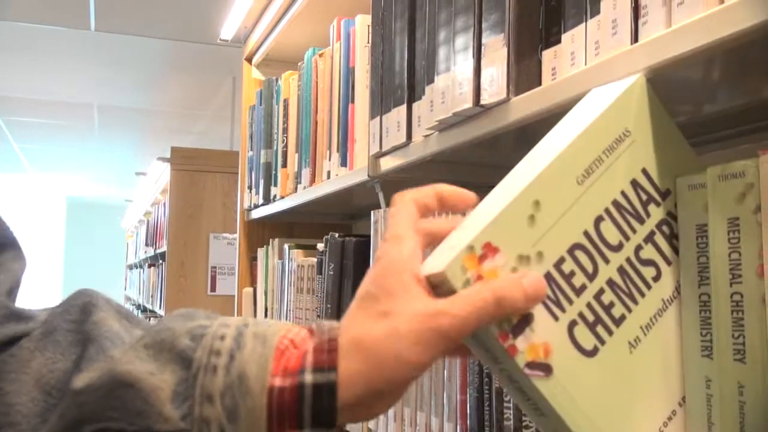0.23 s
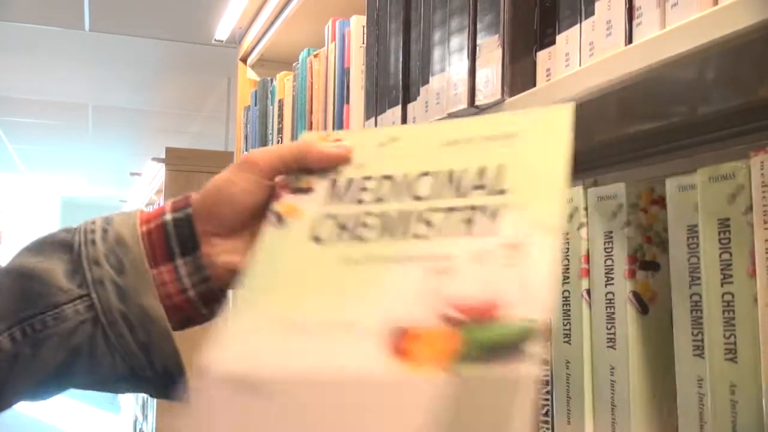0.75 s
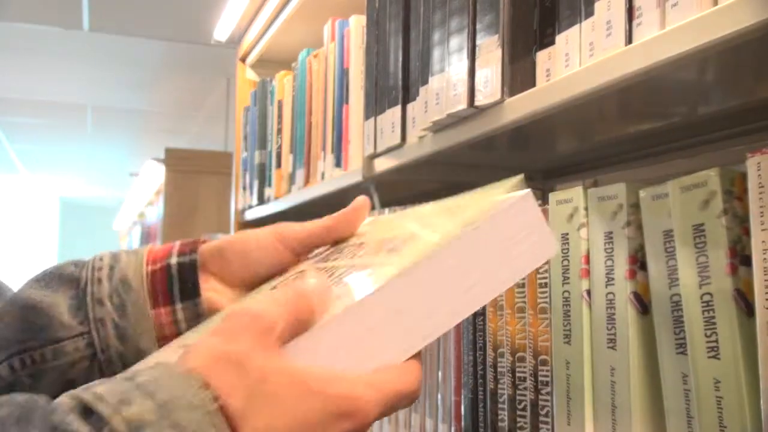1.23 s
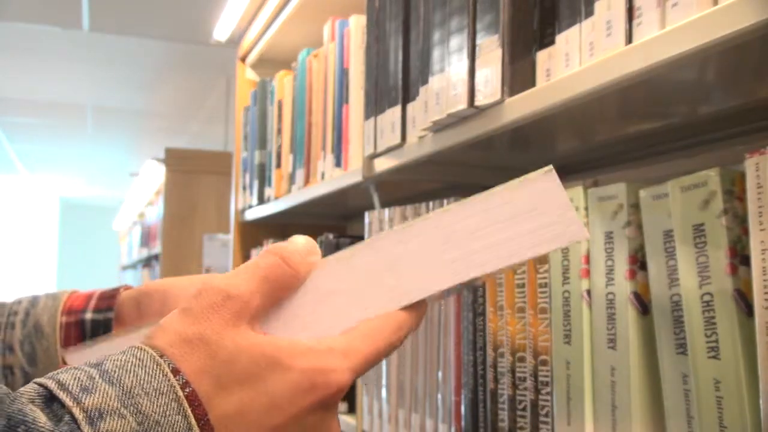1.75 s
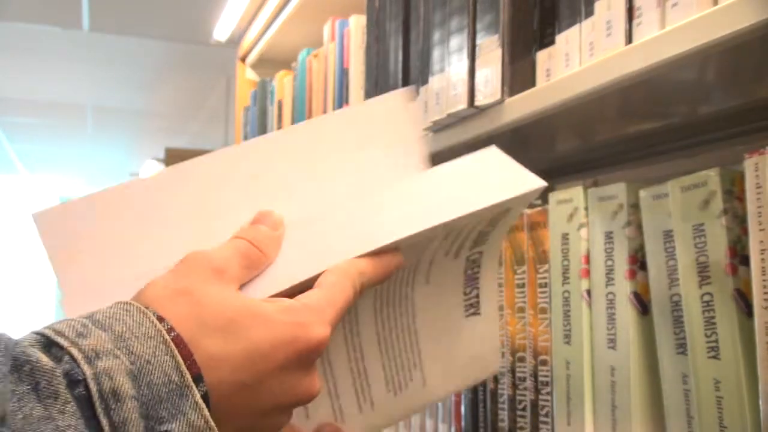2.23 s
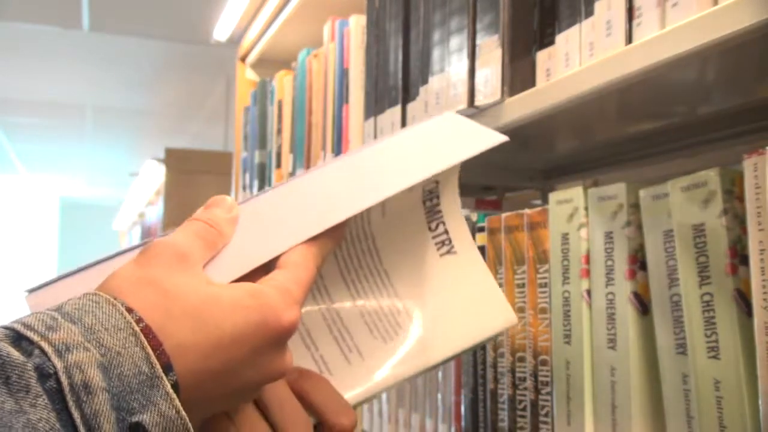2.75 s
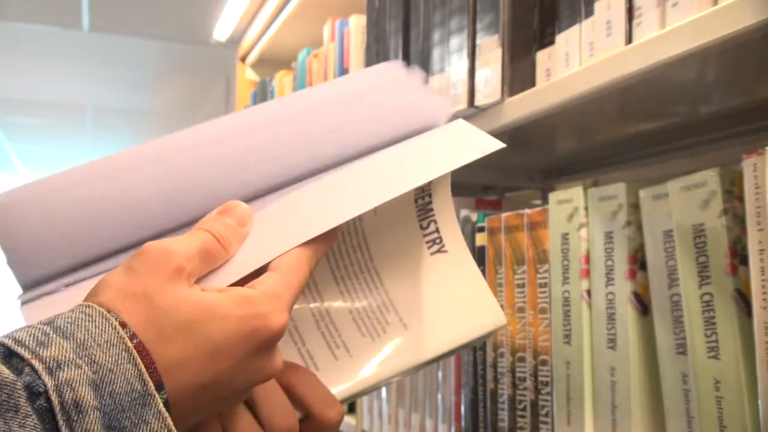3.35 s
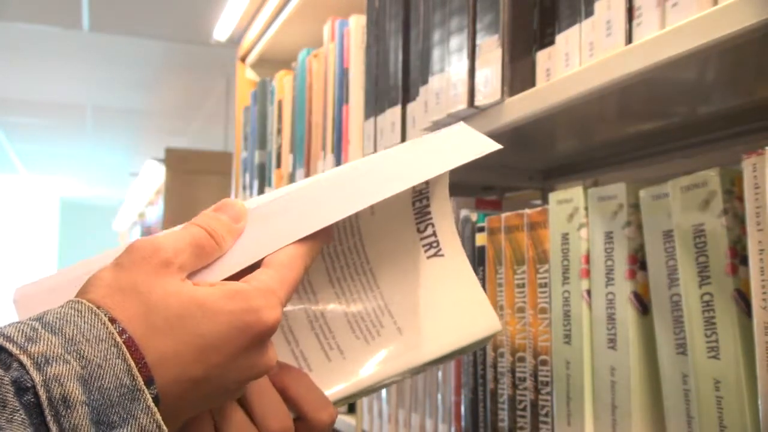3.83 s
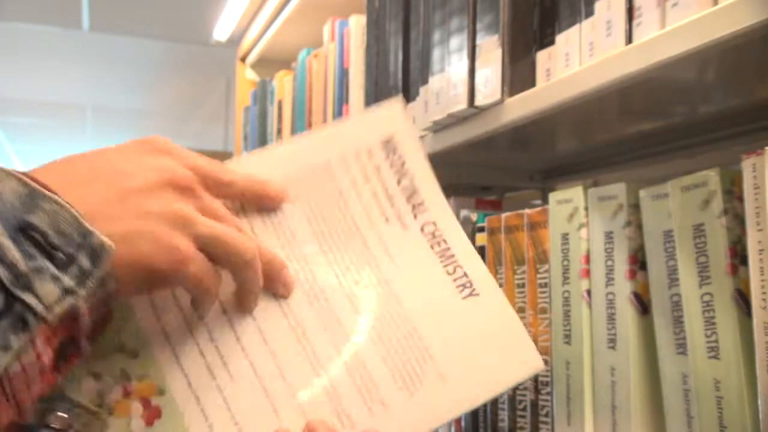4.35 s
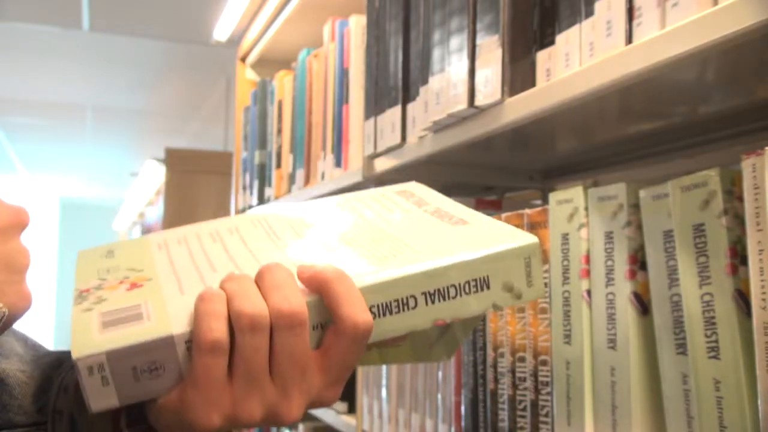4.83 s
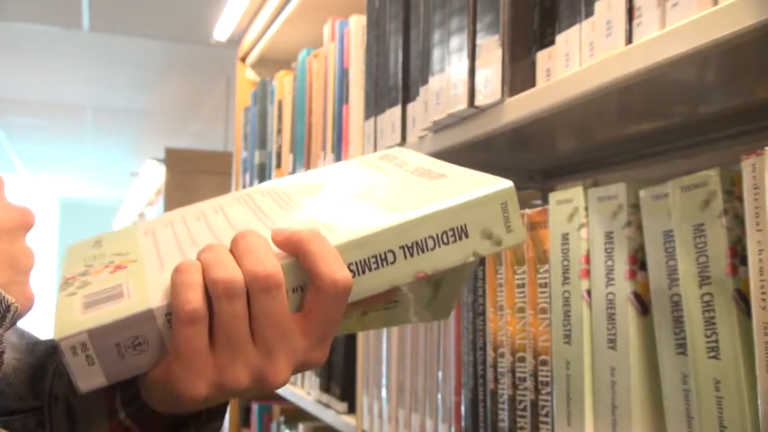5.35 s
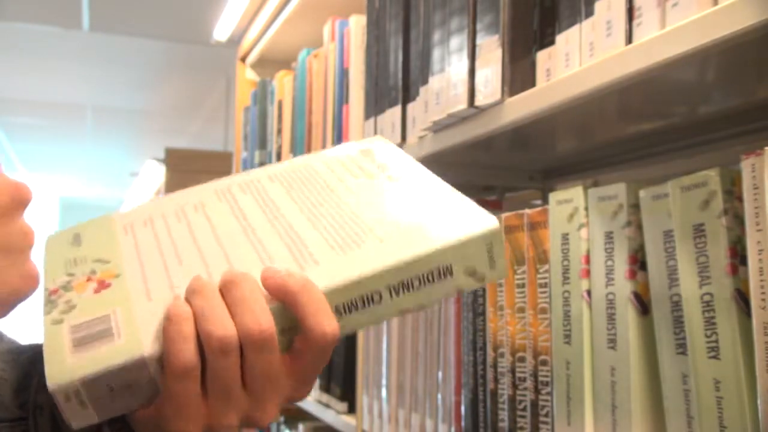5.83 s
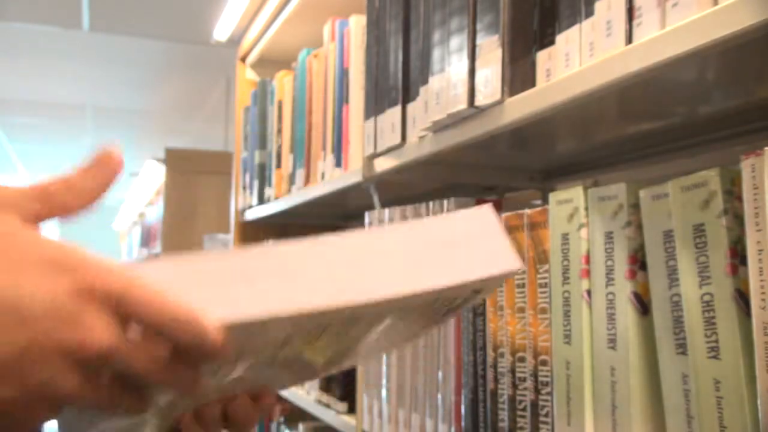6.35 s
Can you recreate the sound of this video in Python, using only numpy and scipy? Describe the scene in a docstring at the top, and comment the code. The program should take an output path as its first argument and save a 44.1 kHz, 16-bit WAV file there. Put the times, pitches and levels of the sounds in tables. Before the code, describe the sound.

Close and dry, slightly right of centre: a glossy book cover scrapes along its neighbours, bumps a steel shelf and pulls free with a sharp swish. Muffled hand thuds and a page flap follow, then bursts of crisp riffling paper, densest halfway through, and a closing slap. Low ventilation hum and thin hiss dip under the handling and swell back in the pause before a last rustle.

```python
"""Library aisle: a thick paperback slides off a steel shelf, knocks it, is turned over, flicked through, shut.
Covers, fingertips and paper hiss as coloured noise; the cover squeaks in short gliding tones.
Flaps and page snaps are noise puffs through resonances; thuds and the shelf knock are decaying sines.
Ventilation noise, a low rumble and thin steady tones sink at listed moments and swell back."""
import sys
import numpy as np
from scipy import signal
from scipy.fft import rfft, irfft, next_fast_len
from scipy.io import wavfile
from scipy.ndimage import uniform_filter1d, map_coordinates

SR = 44100
rng = np.random.default_rng(int(sys.argv[2]) if len(sys.argv) > 2 else 0)


def dump_mix(stems):
    """Bounce the given channels to the path in sys.argv[1] as a 16-bit WAV at rate SR."""
    frames = np.atleast_2d(stems).T  # one column per channel
    limited = np.clip(frames, -1, 1)  # hard clip at full scale
    pcm = np.round(limited * 32767).astype(np.int16)
    wavfile.write(sys.argv[1], SR, pcm)


N = 290461

# Paper moving: (time [s], swell [s per 10 dB], hold [s], fade [s per 10 dB],
# whole sheets [dB], folds [dB], surface [dB])
PAPER_RUBS = [(0, .01, 0.01, 0.094, -43, -43.5, -46.5), (.18, 0.06, 0.052, 0.026, -52, -51.5, -50),
              (.335, 0.072, .005, 0.1, -52.5, -70, -74), (.625, 0.11, 0.077, 0.019, -50, -50, -51),
              (.71, 0.028, 0.034, 0.013, -55, -55, -47.5), (.78, 0.024, 0.023, 0.28, -48.5, -55, -77),
              (.986, 0.16, 0.099, .02, -55, -48.5, -48), (1.177, 0.056, .005, 0.027, -62, -59.5, -62.5),
              (1.5, 0.12, 0.035, 0.029, -54, -53, -56), (1.734, 0.15, .005, 0.11, -45.5, -54.5, -52.5),
              (1.9, 0.04, 0.23, .03, -57, -65, -68), (2.217, 0.044, 0.023, 0.076, -38, -46, -49.5),
              (2.5, 0.032, 0.019, 0.043, -43.5, -45.5, -50.5),
              (2.565, 0.012, 0.043, 0.013, -52, -52.5, -49.5), (2.67, 0.023, .005, 0.12, -66, -55.5, -58),
              (2.768, 0.068, 0.048, 0.025, -38, -59, -77), (2.854, 0.035, .005, 0.029, -49, -57, -58.5),
              (3.135, 0.0096, 0.029, 0.055, -41.5, -44, -44.5),
              (3.225, 0.047, 0.031, 0.0063, -45.5, -49, -47), (3.328, 0.035, .005, 0.024, -48, -52, -49),
              (3.365, 0.016, .02, 0.043, -50, -47, -60), (3.44, 0.033, 0.029, 0.014, -36.5, -43, -47.5),
              (3.536, .02, .005, 0.0092, -45.5, -56, -60), (3.686, 0.073, 0.0034, 0.074, -45, -59, -75),
              (3.63, 0.057, .01, .03, -53, -66, -81), (3.7, 0.036, .01, 0.026, -56, -48.5, -71.5),
              (3.77, 0.023, 0.0061, 0.016, -58.5, -61, -63.5), (4.135, 0.063, .03, 0.13, -52, -58.5, -58),
              (4.262, 0.018, 0.036, 0.021, -47, -45.5, -50), (4.37, 0.064, 0.073, 0.036, -43, -45, -48.5),
              (4.518, .04, .005, .015, -53, -80, -78), (4.68, 0.13, 0.0041, 0.048, -62, -55, -56.5),
              (4.769, 0.046, 0.0037, 0.36, -47, -54.5, -58),
              (6.142, 0.088, 0.0024, 0.0084, -44.5, -43.5, -47.5),
              (6.449, 0.24, 0.097, .1, -53, -58, -61.5)]
# Colour of crisp paper: (frequency [Hz], relative density [dB])
CRISP_COLOUR = [(470, -33), (800, -12), (1610, 2.5), (2280, -3), (3450, -11.5), (4650, -3), (6430, -8),
                (8460, -6.5), (15800, -11)]
USUAL_DB = -25  # level at which a burst has its nominal sharpness


def amp(db):
    """Gain of a level in dB."""
    return 10 ** (np.asarray(db) / 20)


def unit(x):
    """Scaled to rms 1."""
    return x / np.sqrt(np.mean(x ** 2) + 1e-20)


def along(points, hz):
    """Interpolates (Hz, value) points on a log frequency axis."""
    f, v = np.transpose(points)
    return np.interp(np.log(hz + 1), np.log(f + 1), v)


def wobble(rate_hz):
    """Smooth random curve with rate_hz knots a second."""
    knots = rng.standard_normal(int(N * rate_hz / SR) + 4)
    return map_coordinates(knots, [np.arange(N) * rate_hz / SR])


def filtered(x, response):
    """Multiplies the spectrum of x by a response of frequency."""
    size = next_fast_len(N + 8192)
    spectrum = rfft(x, size) * response(np.fft.rfftfreq(size, 1 / SR))
    return irfft(spectrum, size)[..., :N]


def noise(colour, grain_db=0.0, grain_rate_hz=300.0):
    """Coloured noise of rms 1, broken into grains of uneven size."""
    white = rng.standard_normal(N) * amp(grain_db * wobble(grain_rate_hz))
    return unit(filtered(white, lambda hz: amp(along(colour, hz))))


def slow(gain_at):
    """Gain curve of time, computed in coarse steps and joined by lines."""
    grid_samples = 32
    steps = np.arange(0, N + grid_samples, grid_samples)
    return np.interp(np.arange(N), steps, gain_at(steps / SR))


def strokes(rows, column=4):
    """Summed gain of strokes that swell, hold and fade along straight lines in dB."""
    step_db = 10  # swell and fade times are per this change of level

    def stroke(t, row):
        s, swell, hold, fade = row[:4]
        before = np.maximum((s - t) / max(swell, .002), 0)
        after = np.maximum((t - s - hold) / max(fade, .002), 0)
        return amp(row[column] - step_db * (before + after))

    return slow(lambda t: sum(stroke(t, row) for row in rows))


def fall(t60_s, rise_s):
    """Rising and decaying envelope of a blow, faded out by 1/7 s, and its time axis."""
    t = np.arange(SR // 7) / SR
    decay = amp(-60 * t / np.clip(t60_s, .003, 1))
    fade_out = np.cos(np.pi / 2 * t / t[-1])
    return decay * (1 - np.exp(-t / rise_s)) * fade_out, t


def add(track, s, sound):
    """Mixes a sound in at s seconds."""
    track[max(round(s * SR), 0):][:len(sound)] += sound


def bursts(events, sharpness, reach, rise_s, colour, blow):
    """Impulse and noise puff through a resonance applied twice; harder blows ring broader."""
    broadens = 0.12  # dB of width per dB of strength
    out = np.zeros(N + SR)
    for s, db, hz, t60_s in events:
        shape, t = fall(t60_s, rise_s)
        q = np.clip(sharpness * amp(broadens * (USUAL_DB - db)), hz / SR * 3, 6)
        b, a = signal.iirpeak(np.clip(hz, 100, 14000), q, SR)
        push = shape * colour[round(s * SR):][:len(t)] + blow * (t == t[8])
        treble_edge_hz = min(reach * hz, .45 * SR)
        soft = signal.lfilter(*signal.butter(2, treble_edge_hz, fs=SR), push)
        puff = signal.lfilter(b, a, signal.lfilter(b, a, soft))
        add(out, s, amp(db) * puff / np.max(np.abs(puff)))
    return out[:N]


def cover_slides():
    """Glossy cover rubbing its neighbours: even hiss that stops as the cover comes free."""
    # (time [s], swell [s per 10 dB], hold [s], fade [s per 10 dB], level [dB])
    slides = [(0.0, .01, 0.17, 0.087, -39), (0.538, 0.041, 0.12, 0.026, -45),
              (0.704, 0.044, 0.005, 0.028, -29)]
    # Cover comes free, one per slide: time [s]
    stops_s = [.235, .66, .752]
    # Colours of first slide, slow and fast part of second: lists of (frequency [Hz], relative density [dB])
    gloss = [
        [(1470, -39), (2500, -25), (3650, -7), (4630, -0.5), (5240, -1.5), (6820, 1), (9500, -2), (10700, 4.5),
         (13800, -6), (15800, -6)],
        [(1470, -41), (2500, -16), (2720, -9), (3650, -13), (4290, 3), (4820, 1.5), (5490, 1.5), (7890, -4.5),
         (11300, 2), (15800, -10)],
        [(1470, -41), (2500, -22), (3200, -17), (3510, -9), (5200, -3.5), (8660, -11), (9420, 1), (10900, 0.5),
         (13300, -5), (15100, -8), (15800, -7)],
    ]
    t = np.arange(N) / SR
    out = np.zeros(N)
    for slide, stop_s, colour in zip(slides, stops_s, gloss):
        contact = np.clip((stop_s - t) / .01, 0, 1)
        out += strokes([slide]) * contact * noise(colour, grain_db=1.5, grain_rate_hz=180.0)
    return out


def paper_rubs():
    """Paper friction moves in grains, coarser for the larger parts."""
    # Colours of whole sheets, folds, surface: (frequency [Hz], relative density [dB])
    sheet = [(120, -23), (200, 6), (400, 2.5), (483, 1.5), (629, -3), (900, -6), (1170, -37), (1980, -120)]
    fold = [(410, -4), (700, 1.5), (1310, 1), (2170, -5.5), (2380, -36.5), (2800, -17.5), (3640, -42),
            (6160, -120)]
    surface = [(1290, -18), (2200, 2), (2370, 5), (3790, -1.5), (4260, 0.5), (5970, -5), (11500, -10.5),
               (15800, -14)]
    sheets = strokes(PAPER_RUBS) * noise(sheet, grain_db=3.0, grain_rate_hz=60.0)
    folds = strokes(PAPER_RUBS, column=5) * noise(fold, grain_db=2.5, grain_rate_hz=140.0)
    surfaces = strokes(PAPER_RUBS, column=6) * noise(surface, grain_db=1.5, grain_rate_hz=240.0)
    return sheets + folds + surfaces


def ticks():
    """Small crackles of uneven size at random moments, as strong as the surface motion."""
    ticks_per_s, t60_s, spread_db, level_db = 65, 0.0094, 5, -10
    sizes = amp(spread_db * rng.standard_normal(N))
    starts = (rng.random(N) < ticks_per_s / SR) * sizes
    shape, _ = fall(t60_s, rise_s=0.0006)
    envelope = np.abs(signal.fftconvolve(starts, shape)[:N])
    crackle = unit(envelope * noise(CRISP_COLOUR))
    return amp(level_db) * strokes(PAPER_RUBS, column=6) * crackle


def sinking():
    """Background gain: after each dip the loss in dB decays exponentially; the deepest loss rules."""
    # (time [s], depth [dB])
    dips = [(0, 14), (.235, 19), (.39, 21), (.59, 5), (.75, 9), (1.09, 20), (1.21, 15), (1.6, 3), (1.78, 6),
            (2.3, 16.5), (2.62, 5), (2.85, 10.5), (3.16, 6.5), (3.472, 23), (3.72, 25), (3.76, 23),
            (3.86, 24.5), (4.2, 5), (4.495, 16), (6.15, 15.5)]
    recover_s = 0.39  # time constant

    def loss_db(t):
        losses = [np.where(t > s, db * np.exp(-np.abs(t - s) / recover_s), 0) for s, db in dips]
        return np.max(losses, axis=0)

    return slow(lambda t: amp(-uniform_filter1d(loss_db(t), size=9)))


def rumble():
    """Low noise that sinks with the background, jumps as the book moves and swells once."""
    # Rumble colour: (frequency [Hz], relative density [dB])
    low_colour = [(13, -40), (22, -12), (54, 8.5), (68, 4.5), (103, 1.5), (151, -8.5), (170, -6.5),
                  (220, -16), (370, -120)]
    # Jumps as the book moves: (time [s], hold [s], level [dB])
    pushes = [(0.01, 0.19, -47), (0.232, 0.012, -36), (0.388, .01, -39), (0.558, .01, -36),
              (0.757, .03, -38), (0.948, .06, -38), (1.048, 0.0083, -29.5), (1.173, 0.14, -41),
              (1.406, .01, -48), (1.521, 0.0088, -37), (1.944, 0.23, -49), (2.275, 0.038, -31.5),
              (2.404, 0.24, -48), (2.693, 0.15, -49.5), (3.107, 0.14, -51), (3.397, 0.053, -54),
              (3.706, 0.0067, -39.5), (4.249, 0.25, -47.5), (4.788, .01, -44), (5.52, 0.0087, -50),
              (5.717, 0.082, -44), (5.97, 0.0079, -47), (6.16, 0.0092, -38)]
    # Low air noise: (time [s], swell [s per 10 dB], hold [s], fade [s per 10 dB], level [dB])
    air_swell = [(5.25, 0.14, 0.25, 0.21, -48)]
    # Its colour: (frequency [Hz], relative density [dB])
    hollow = [(150, -41.5), (250, -2.5), (459, 0), (614, -23), (704, -10), (1100, -26), (1430, -53),
              (2420, -120)]
    steady_db, swell_s, fade_s = -42.5, 0.015, 0.032  # swell and fade per 10 dB
    jumps = strokes([(s, swell_s, hold, fade_s, db) for s, hold, db in pushes])
    low = (amp(steady_db) * sinking() + jumps) * noise(low_colour)
    return low + strokes(air_swell) * noise(hollow)


def background():
    """Ventilation noise, alike left and right in the bass, and steady tones; both sink together."""
    # Ventilation and hiss: (frequency [Hz], relative density [dB])
    air_colour = [(59, -35), (100, -2.5), (201, -4.5), (295, -11), (593, -17.5), (645, -17.5), (832, -20),
                  (1380, -24), (1710, -25.5), (12000, -31.5), (13900, -32), (15800, -32.5)]
    # (frequency [Hz], left-right likeness [0-1])
    alike = [(60, 1.0), (180, 0.99), (550, 0.99), (1650, 0.98), (4970, 0.82), (15000, 0.76)]
    # Tones: (frequency [Hz], rms before wobble and sinking [dB])
    whine = [(14158.7, -63), (7100, -77), (7149, -77), (15687, -76), (1705, -75), (200, -57)]
    air_db = -46  # before sinking
    t = np.arange(N) / SR

    def turn(hz):
        return np.arccos(np.clip(along(alike, hz), -1, 1)) / 2

    mid = filtered(noise(air_colour), lambda hz: np.cos(turn(hz)))
    side = filtered(noise(air_colour), lambda hz: np.sin(turn(hz)))
    tones = np.zeros(N)
    for hz, db in whine:
        level = np.sqrt(2) * amp(db + 0.63 * wobble(7.6))
        tones += level * np.sin(2 * np.pi * hz * t)
    air = amp(air_db) * np.array([mid + side, mid - side])
    return (air + tones) * sinking() * amp([[-.6], [.6]])


def flaps():
    """A sheet slapping another: a duller, narrower puff."""
    # (time [s], level [dB], centre [Hz], t60 [s])
    slaps = [(.005, -19.5, 1250, 0.047), (.062, -18.5, 1230, 0.069), (.205, -26, 353, 0.073),
             (.211, -22, 590, 0.1), (.227, -15.5, 502, 0.04), (.229, -13, 2190, 0.037),
             (.233, -19, 486, 0.024), (.385, -25, 694, .025), (.554, -22, 400, 0.036),
             (.581, -21.5, 350, 0.064), (.74, -23, 930, 0.031), (.743, -27.5, 405, 0.043),
             (.94, -31, 850, 0.025), (1.046, -30.5, 920, 0.058), (1.063, -30, 575, 0.14),
             (1.086, -13, 1370, .019), (1.195, -36, 423, 0.031), (1.519, -34.5, 660, 0.077),
             (1.747, -30, 655, .065), (1.772, -26.5, 860, 0.082), (1.773, -21.5, 1960, 0.047),
             (1.778, -20.5, 360, 0.064), (2.268, -30, 480, .015), (2.269, -14, 2050, .015),
             (2.303, -31, 345, 0.025), (2.595, -32.5, 1480, 0.089), (2.75, -21.5, 565, 0.078),
             (2.778, -23, 483, 0.085), (2.798, -31, 476, 0.096), (2.829, -26.5, 520, 0.04),
             (2.85, -26, 437, 0.054), (2.866, -26.5, 1010, .044), (3.137, -34, 374, .044),
             (3.152, -32.5, 375, 0.059), (3.249, -36, 440, 0.038), (3.351, -18.5, 430, 0.032),
             (3.361, -19.5, 446, 0.05), (3.4, -34, 764, .05), (3.423, -27, 477, 0.027),
             (3.442, -17.5, 607, 0.048), (3.45, -18.5, 730, 0.028), (3.472, -24, 1250, 0.023),
             (3.514, -36.5, 1170, .065), (3.539, -33, 1010, .054), (3.612, -36, 530, 0.028),
             (3.652, -27, 530, 0.031), (3.686, -19.5, 990, 0.022), (3.715, -28, 750, 0.036),
             (3.755, -43, 1920, 0.044), (3.834, -48, 530, 0.12), (3.846, -39.5, 1110, 0.053),
             (3.85, -48, 1740, 0.046), (4.131, -34.5, 404, 0.027), (4.171, -41, 413, 0.065),
             (4.254, -42, 450, 0.052), (4.485, -19, 404, 0.025), (4.489, -20.5, 645, 0.033),
             (4.498, -25, 384, 0.053), (4.529, -38, 438, .03), (4.767, -32, 435, 0.022),
             (6.149, -20.5, 543, 0.0062)]
    white = rng.standard_normal(N)
    return bursts(slaps, sharpness=1.25, reach=3.7, rise_s=0.0018, colour=white, blow=10.4)


def snaps():
    """A page edge slipping off the thumb: a few milliseconds of broad crackle."""
    # (time [s], level [dB], centre [Hz], t60 [s])
    edges = [(.0054, -15.5, 1820, 0.007), (.022, -29, 4000, .008), (.0608, -43, 2020, .013),
             (.2275, -28.5, 4500, 0.0097), (.237, -36, 2330, 0.013), (.3825, -35.5, 2250, 0.0093),
             (.5645, -32, 4430, .015), (.744, -19.5, 4230, 0.0076), (1.0454, -36, 2290, 0.02),
             (1.065, -28, 2570, 0.017), (1.0859, -15, 4060, .011), (1.7721, -35, 5000, 0.011),
             (2.044, -35.5, 8080, .015), (2.0845, -24.5, 6510, 0.019), (2.2707, -17.5, 4750, 0.013),
             (2.2912, -22, 5000, 0.015), (2.4177, -44, 6500, .01), (2.4329, -34, 2550, 0.0055),
             (2.594, -28.5, 3400, .017), (2.6143, -36, 3280, 0.0059), (2.645, -34, 2560, 0.0063),
             (2.829, -36, 6960, .019), (2.8423, -14.5, 6000, 0.013), (3.1224, -31.5, 5000, .012),
             (3.1487, -26.5, 3430, .045), (3.2217, -35, 3010, 0.017), (3.2387, -27, 2300, 0.026),
             (3.2503, -20.5, 4450, 0.018), (3.2944, -30, 2500, 0.04), (3.3315, -30.5, 3000, 0.018),
             (3.3543, -30.5, 5000, 0.031), (3.3676, -29.5, 2980, 0.011), (3.3901, -27.5, 2680, .02),
             (3.4134, -29, 2930, 0.015), (3.431, -27, 3140, .021), (3.4424, -35, 2810, 0.018),
             (3.452, -13.5, 2500, 0.017), (3.474, -19.5, 4870, 0.021), (3.5488, -33.5, 3330, 0.01),
             (3.6736, -46, 5000, 0.01), (3.688, -53, 4040, .012), (3.7183, -15, 4860, 0.013),
             (3.7564, -10, 5400, 0.0043), (3.8262, -55, 4000, 0.017), (4.1773, -32, 6800, .012),
             (4.1944, -33, 4500, .015), (4.4824, -28, 1810, 0.0088), (4.4879, -34, 1940, 0.014),
             (4.4899, -19, 2950, 0.018), (4.493, -19.5, 3500, 0.01), (4.721, -39.5, 8000, 0.024),
             (6.1493, -20.5, 2400, 0.0089), (6.174, -44, 2000, .01), (6.2394, -33, 3680, 0.0076),
             (6.4372, -40, 3810, 0.048)]
    crackle = noise(CRISP_COLOUR, grain_db=4.0, grain_rate_hz=2000.0)
    return bursts(edges, sharpness=0.63, reach=9, rise_s=0.0011, colour=crackle, blow=2.44)


def squeaks():
    """Cover sticking and slipping: slightly unsteady, gliding tones that swell and fade."""
    # (time [s], level [dB], first pitch [Hz], last pitch [Hz], length [s])
    glides = [(0.131, -32, 11300, 10500, .014), (0.16, -38, 9800, 10500, .009),
              (.685, -26, 15000, 15100, .02), (0.788, -41, 570, 600, 0.061), (0.807, -46, 640, 847, 0.093),
              (.885, -41.5, 588, 560, .06), (.925, -39.5, 550, 494, 0.029)]
    out = np.zeros(N + SR)
    for s, db, first_hz, last_hz, length_s in glides:
        count = round(length_s * SR)
        drift = 1 + 0.0003 * np.cumsum(rng.standard_normal(SR // 10)[:count])
        pitch_hz = np.linspace(first_hz, last_hz, count) * drift
        tone = np.sin(2 * np.pi * np.cumsum(pitch_hz) / SR)
        add(out, s, amp(db) * np.hanning(count) * tone)
    return out[:N]


def thuds():
    """The block of pages rings a few cycles as a decaying sine."""
    # (time [s], level before a 5 dB lift [dB], pitch [Hz], t60 [s])
    blocks = [(0.212, -21.5, 185, 0.07), (0.229, -24.5, 206, 0.11), (0.362, -32, 207, 0.046),
              (0.384, -18.5, 201, 0.079), (0.48, -34, 203, 0.053), (0.553, -26, 189, 0.15),
              (0.577, -21.5, 187, 0.12), (0.749, -32, 184, 0.095), (1.062, -25, 240, 0.035),
              (1.169, -29.5, 188.6, 0.066), (1.198, -29, 207, 0.11), (1.404, -35, 188, 0.11),
              (1.521, -27, 167, 0.075), (1.538, -30.5, 222, 0.091), (1.747, -24.5, 223, 0.056),
              (1.771, -25, 209, 0.12), (2.204, -36, 187, 0.069), (2.27, -23, 232, 0.034),
              (2.298, -15.5, 194, 0.036), (2.334, -26, 181, 0.11), (2.703, -37, 256, 0.065),
              (2.754, -28, 227, 0.049), (3.145, -25, 383, 0.077), (3.346, -32, 403, 0.067),
              (3.446, -37, 355, 0.034), (3.68, -50, 250, 0.086), (3.716, -39, 360, 0.073),
              (4.125, -45, 260, 0.073), (4.171, -29, 173, 0.031), (4.405, -39, 207, 0.08),
              (4.482, -18, 267, 0.028), (4.523, -32.5, 198, 0.066), (4.637, -29, 201, 0.026),
              (6.14, -29.5, 161, 0.08), (6.267, -33.5, 202, 0.11), (6.433, -34.5, 203.7, 0.12)]
    out = np.zeros(N + SR)
    for s, db, hz, t60_s in blocks:
        rise_s = 0.0016 * amp(-.6 * (db + 20.0))  # light contacts are softer and rise slowly
        shape, t = fall(t60_s, rise_s)
        add(out, s, amp(db + 5) * shape * np.sin(2 * np.pi * hz * t))
    return out[:N]


def shelf_knock():
    """The book knocks the steel shelf, which rings in several modes."""
    # (time [s], level [dB])
    knocks = [(0.229, -33)]
    # Modes: (frequency [Hz], level relative to knock [dB], t60, at most 1 used [s])
    modes = [(450, 0, 0.19), (690, -12.5, 1.1), (820, -9, 0.13), (1250, -18.5, 0.83), (1480, -26, 0.74),
             (2020, -13.5, 0.3), (2293, -32, 0.51)]
    out = np.zeros(N + SR)
    for s, db in knocks:
        for hz, level_db, t60_s in modes:
            shape, t = fall(t60_s, rise_s=0.0015)
            add(out, s, amp(db + level_db) * shape * np.sin(2 * np.pi * hz * t))
    return out[:N]


def aisle(x):
    """Short, dull answer of the shelves: convolution with decaying low-passed noise."""
    shape, t = fall(0.053, rise_s=0.00089)
    tail = signal.lfilter([.3], [1, -.7], shape * rng.standard_normal(len(t)))
    return signal.fftconvolve(x, tail / np.linalg.norm(tail))[:N]


def skin_brushes():
    """Fingertips brushing the cover: even hiss."""
    # (time [s], swell [s per 10 dB], hold [s], fade [s per 10 dB], level [dB])
    brushes = [(1.416, 0.024, .002, 0.0061, -46), (1.48, 0.0068, 0.028, 0.13, -49.5),
               (2.04, .03, .1, .02, -54.5), (2.088, 0.0049, 0.0016, 0.0035, -44),
               (4.126, 0.058, .01, .03, -58.5), (4.174, .035, .002, .03, -51)]
    # (frequency [Hz], relative density [dB])
    skin = [(2060, -22), (3500, -5.5), (3820, -16), (5510, -1.5), (6620, 1), (11300, -1), (15800, -2)]
    return strokes(brushes) * noise(skin, grain_db=1.0, grain_rate_hz=150.0)


def scene():
    """Book right of centre, over the rumble and the background."""
    blows = flaps() + snaps() + thuds() + shelf_knock()
    friction = cover_slides() + paper_rubs() + ticks() + squeaks() + skin_brushes()
    book = blows + amp(-15) * aisle(blows) + friction
    return book * amp([[-1.5], [1.5]]) + rumble() * amp([[-1.2], [1.2]]) + background()


def record(dry):
    """Rounds peaks off softly towards 0.3, then removes everything above the band limit."""
    top_hz = 15850
    rounded = dry / (1 + np.abs(dry / .3) ** 4) ** (1 / 4)
    return filtered(rounded, lambda hz: hz < top_hz)


dry = scene()
out = record(dry)
dump_mix(out)
```